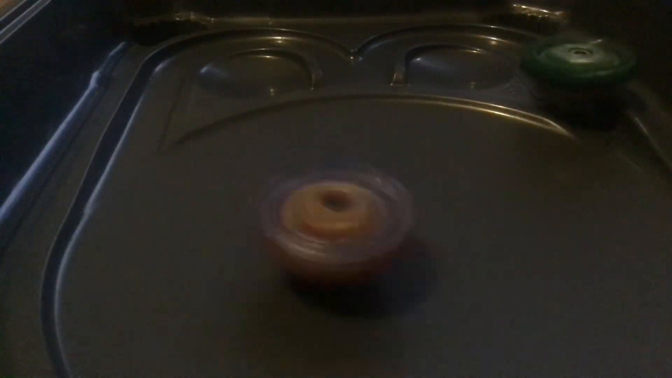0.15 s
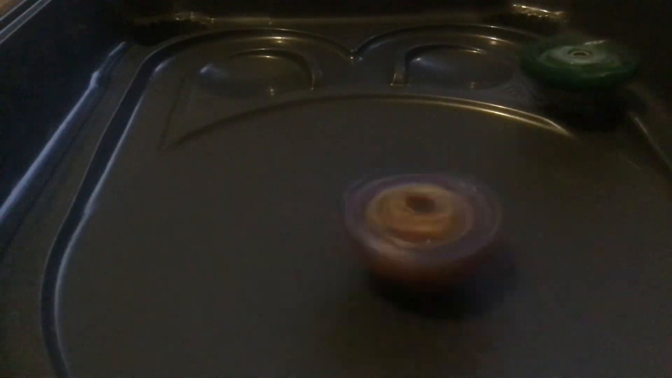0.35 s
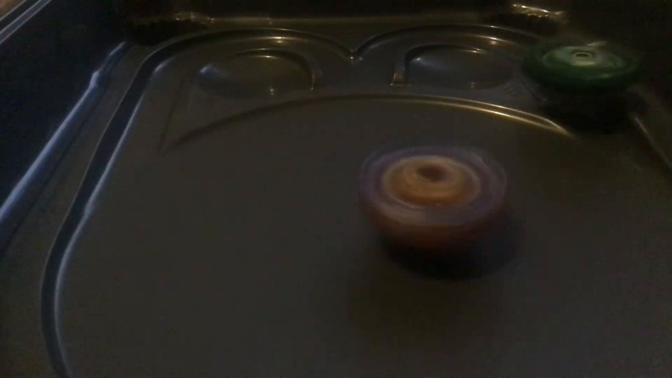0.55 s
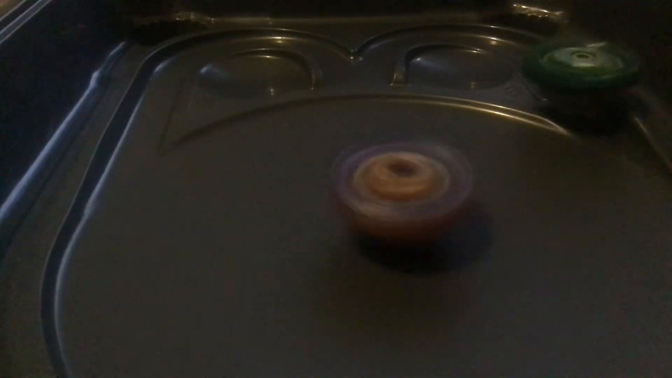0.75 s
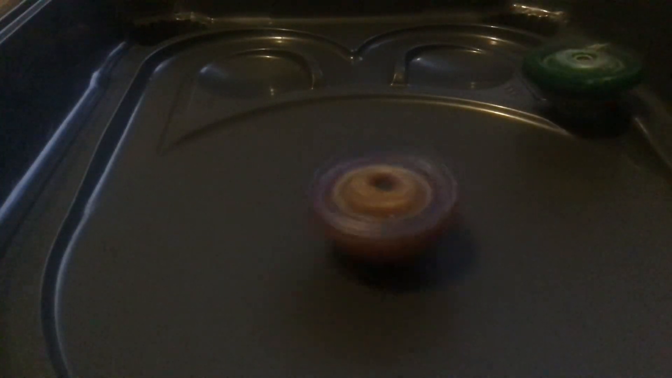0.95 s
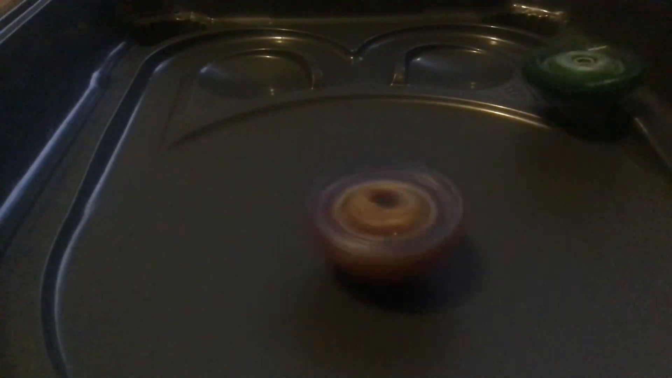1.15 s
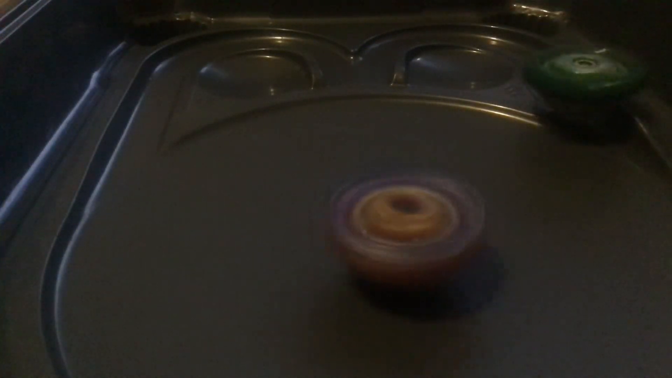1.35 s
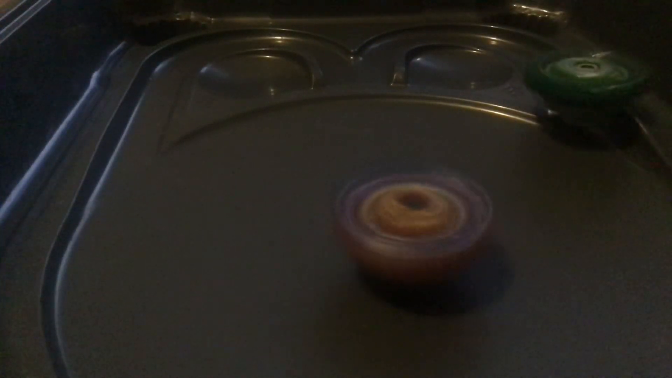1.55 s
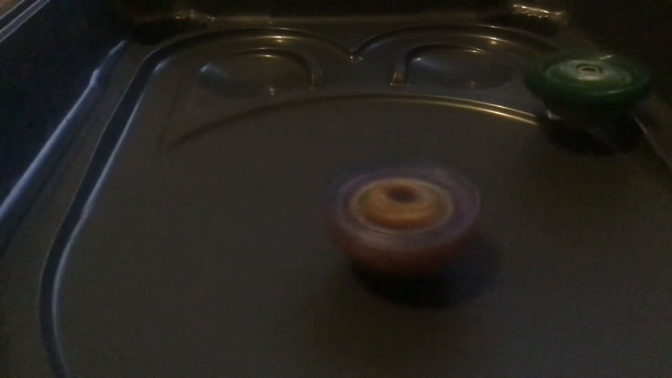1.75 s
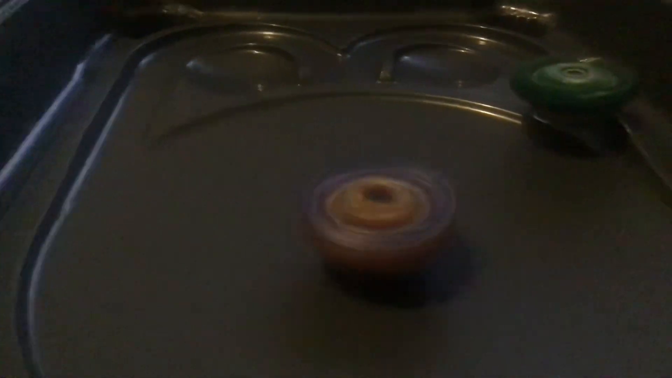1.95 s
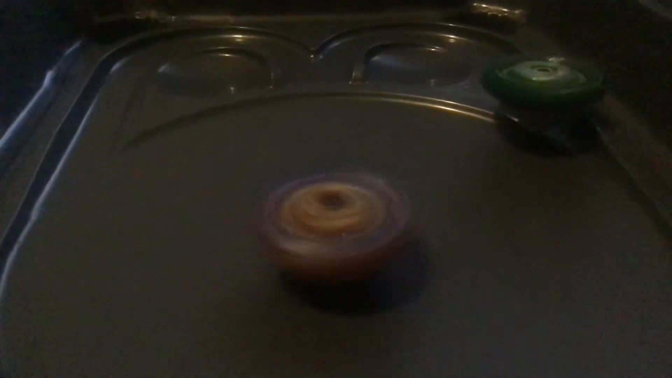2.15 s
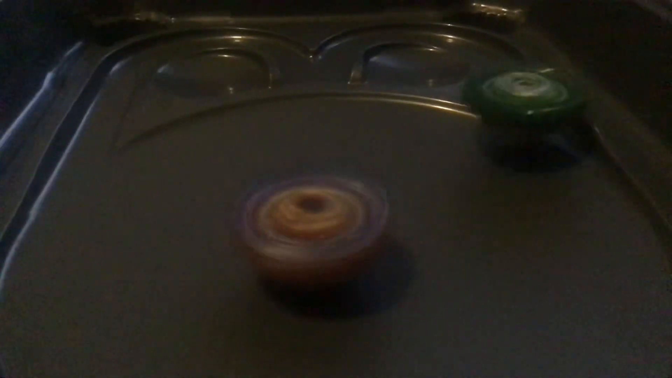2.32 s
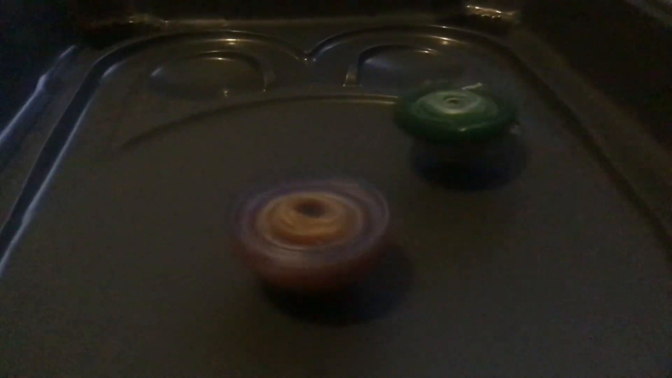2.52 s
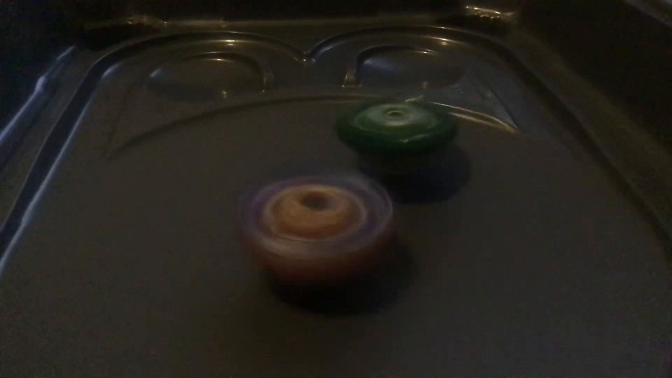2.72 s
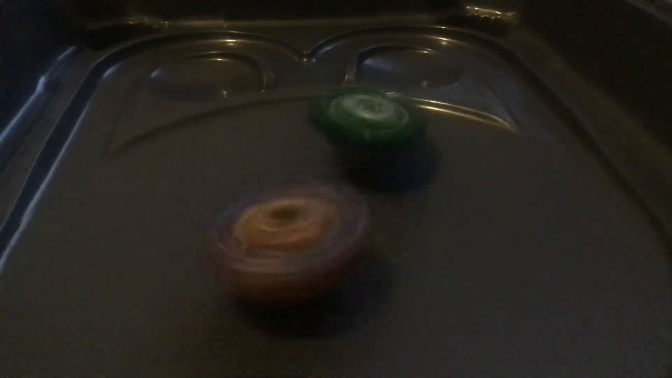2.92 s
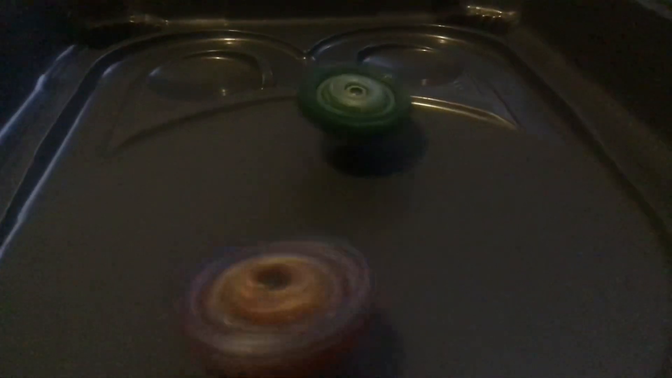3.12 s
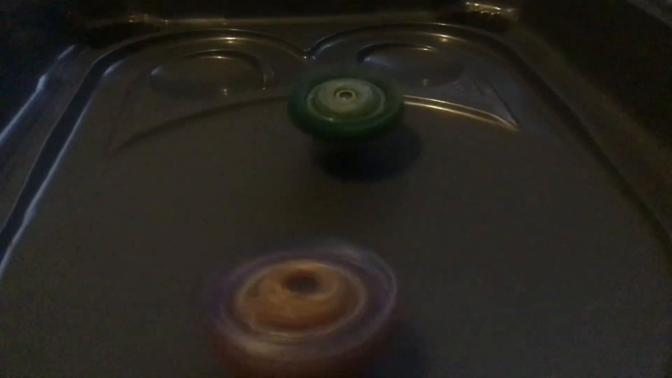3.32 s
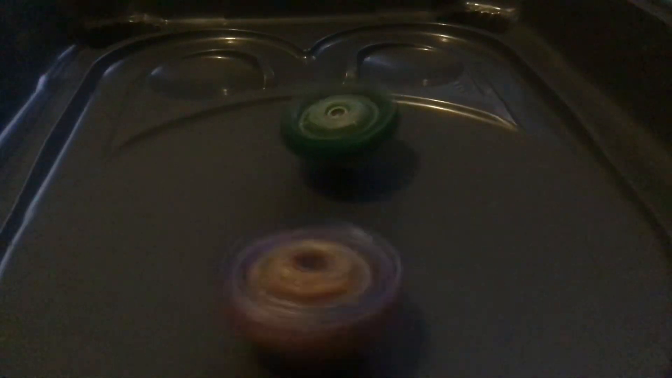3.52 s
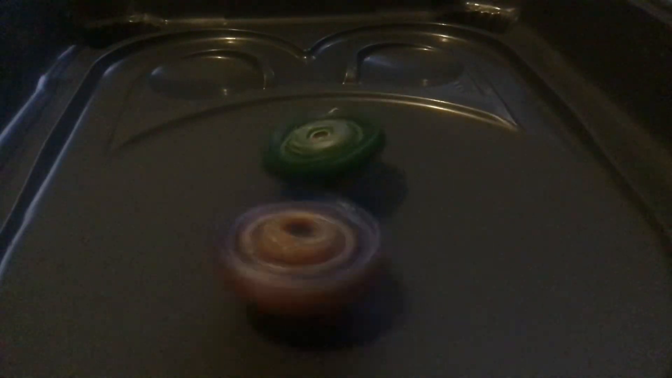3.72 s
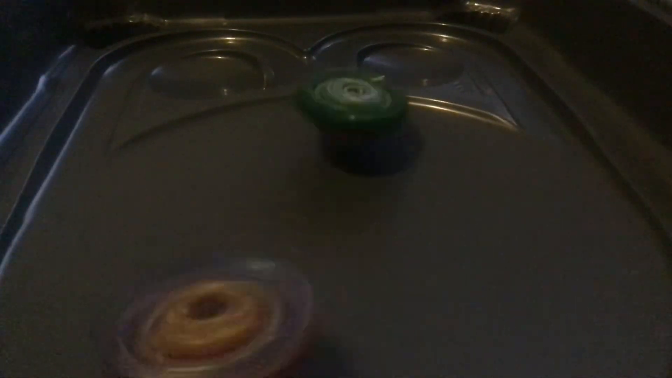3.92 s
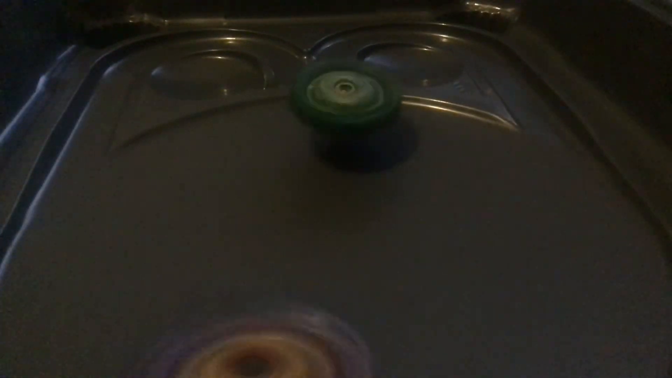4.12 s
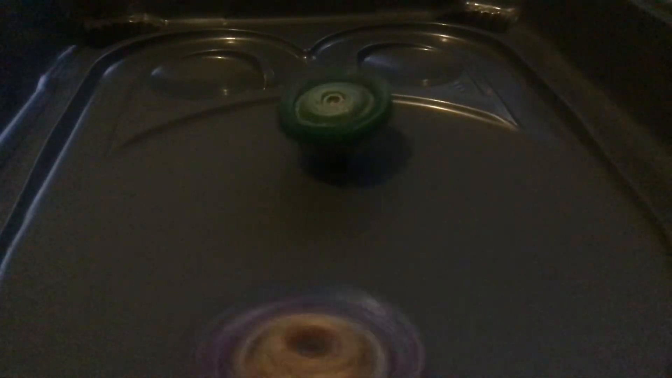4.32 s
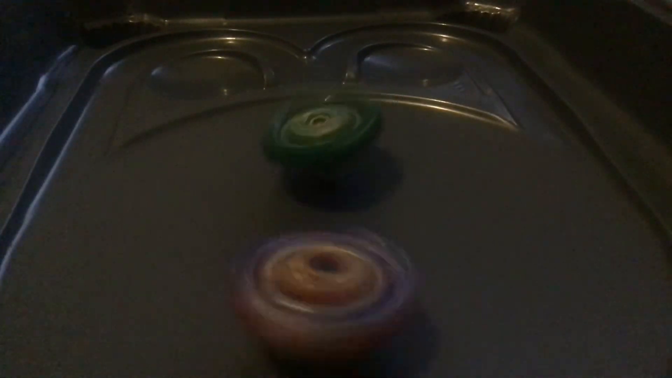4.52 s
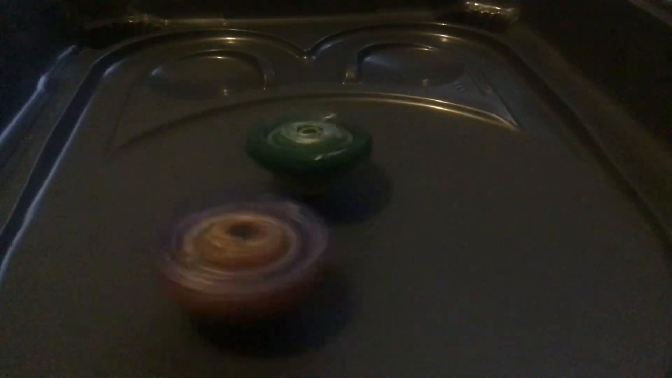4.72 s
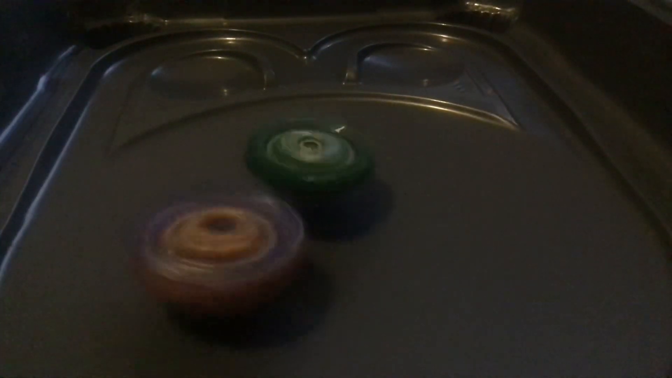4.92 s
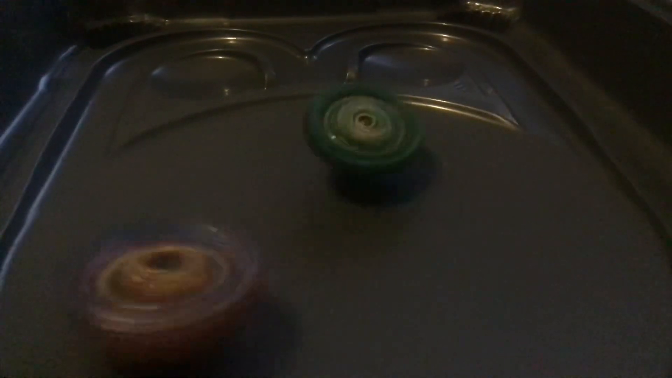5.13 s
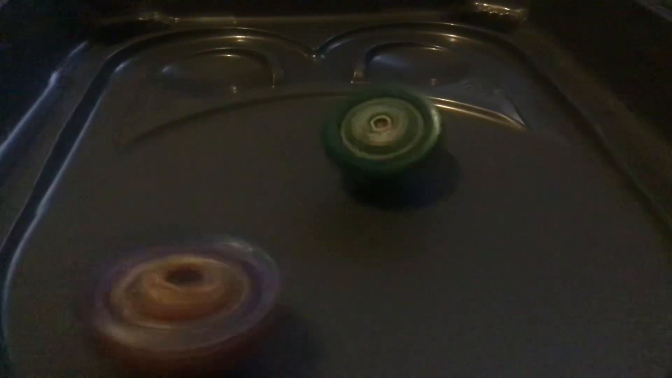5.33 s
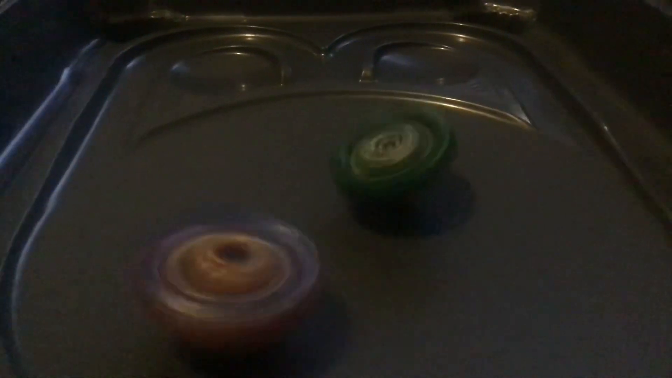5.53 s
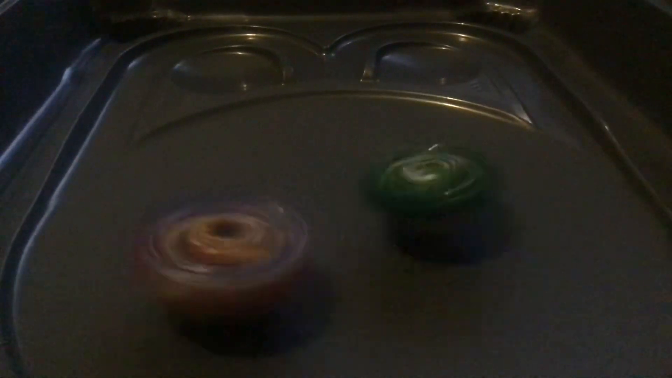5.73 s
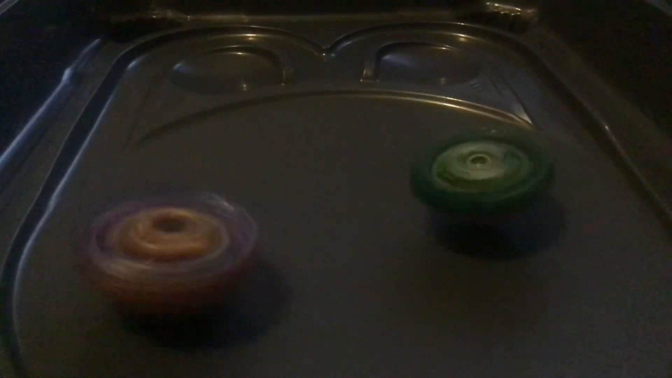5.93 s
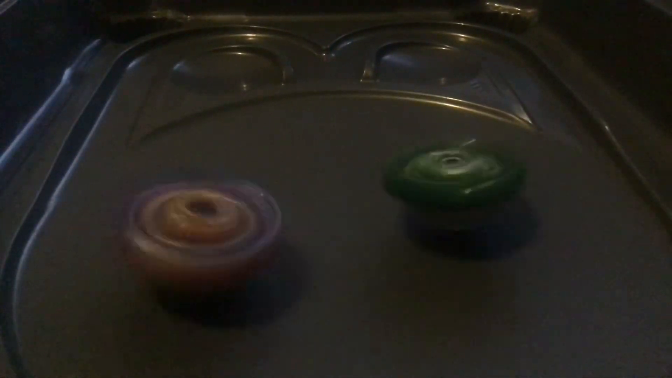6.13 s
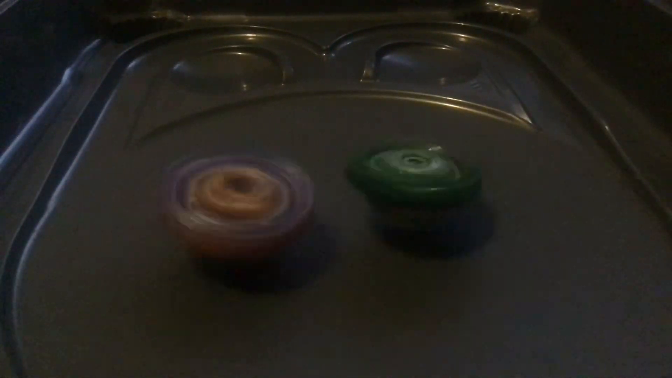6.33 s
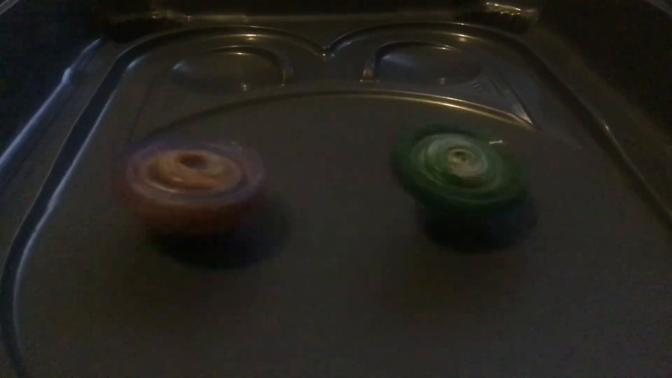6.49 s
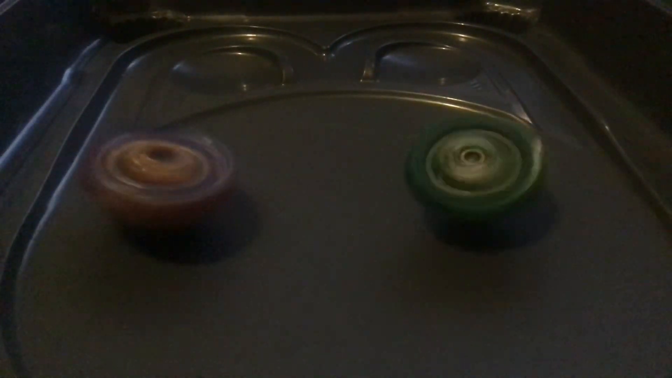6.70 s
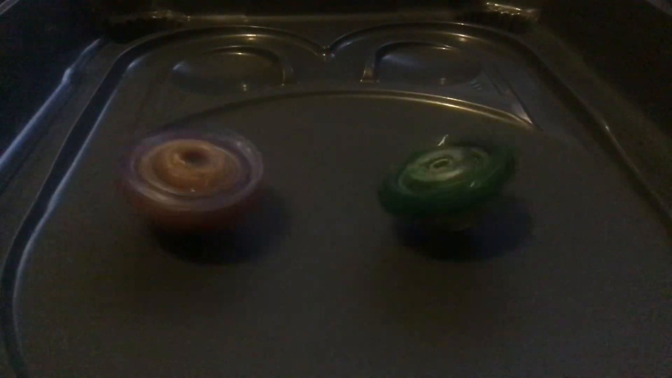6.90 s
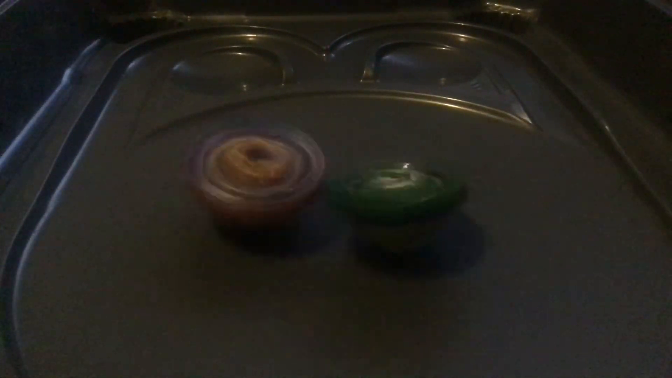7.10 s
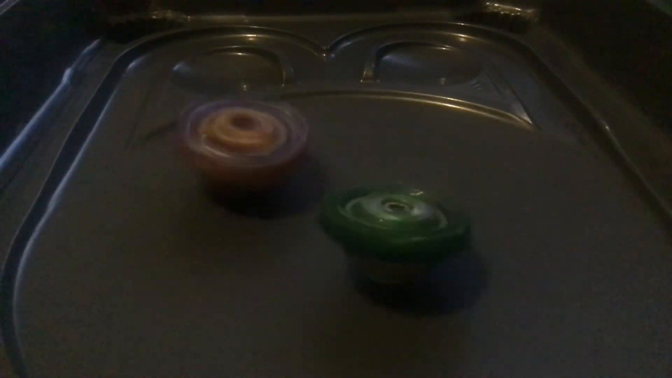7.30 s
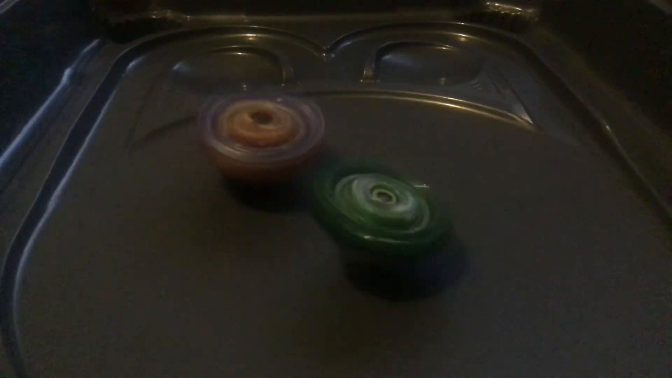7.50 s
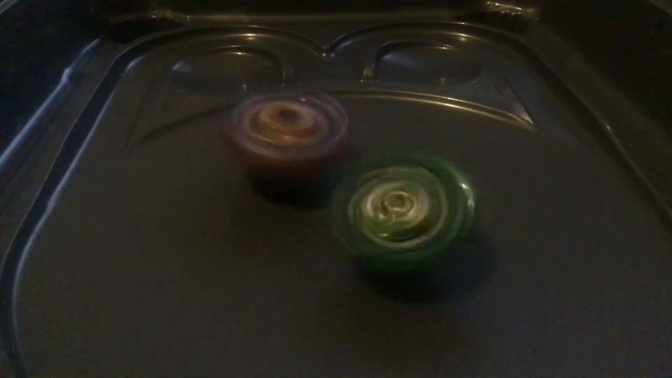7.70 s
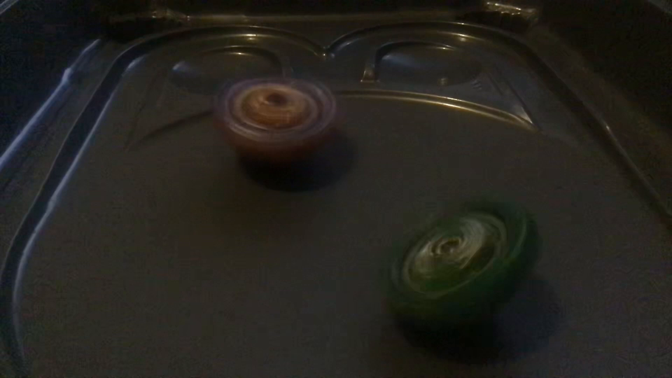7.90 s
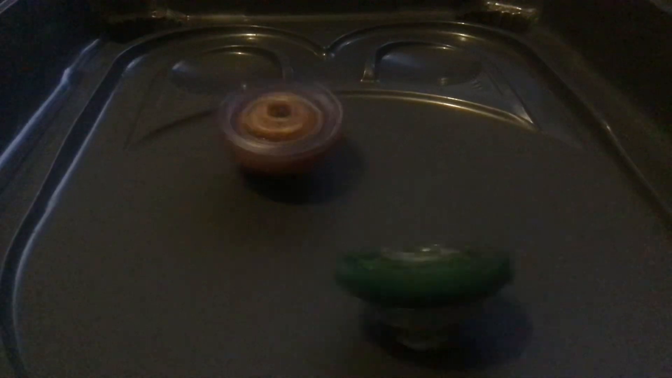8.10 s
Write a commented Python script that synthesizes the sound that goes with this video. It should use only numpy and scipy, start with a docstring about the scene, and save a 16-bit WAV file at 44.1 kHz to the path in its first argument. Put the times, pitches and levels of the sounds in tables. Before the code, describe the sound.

Close to a thin plastic arena in a small quiet room, a fast toy top hums and hisses while rapid knocks rattle the wall, thinning into soft boomy taps. From about three seconds two tops strike each other eight times, each a loud hard clack with a brief metallic ring and drum-like floor thud. Between hits come scrapes, ticks and scuffs as the spin slows.

```python
"""A toy top hums and knocks quickly on the wall of a thin plastic arena, its tip hissing over the floor.
Each knock is a burst of micro-impacts through the wall's resonances; the hum follows the slowing spin.
Eight times two tops collide: a hard clack with a ring of metal discs, thuds on the drum-like floor and a
swell of rumble. In between, rims scrape and a wobbling top ticks and scuffs with its loose parts.
A small room answers with short reflections, over quiet air and a few faint falling tones."""
import sys
import numpy as np
from scipy import signal
from scipy.fft import rfft, irfft
from scipy.io import wavfile
from scipy.ndimage import uniform_filter1d

SR = 44100
rng = np.random.default_rng(int(sys.argv[2]) if len(sys.argv) > 2 else 0)


def inscribe(sig):
    """Save sig as 16-bit PCM at rate SR to the path in sys.argv[1].

    A 1-D sig is mono; a 2-D sig holds one channel per row.
    Samples are clipped to [-1, 1] before scaling.
    """
    pcm = np.round(np.clip(np.atleast_2d(sig).T, -1, 1) * 32767)
    wavfile.write(sys.argv[1], SR, pcm.astype(np.int16))


N = 359415
TIME = np.arange(N) / SR
HIT = 8192  # length of a blow [samples]
CREST_DB = 9.5  # assumed height of a burst's peak over its loudest short-term rms

# All table levels are settings ahead of the trims made where they are played.


def undb(db):
    """Decibels to gain."""
    return 10 ** (np.asarray(db) / 20)


def unit(x):
    """Scale to a standard deviation of 1."""
    return x / np.std(x)


def curves(table):
    """The columns of a table, interpolated sample by sample."""
    s, *columns = np.transpose(table)
    return [np.interp(TIME, s, column) for column in columns]


def add(track, s, sound):
    """Mix a sound into the track at time s."""
    i = int(np.clip(s * SR, 0, len(track) - 1))
    track[i:i + len(sound)] += sound[:len(track) - i]


def colour(x, points):
    """Minimum-phase filter with the given spectrum, so no sound comes ahead of its cause."""
    hz, db = np.transpose(points)
    grid = np.fft.rfftfreq(HIT, 1 / SR) + 1
    # beyond the end points the spectrum falls 20 dB per octave
    octaves_below = np.maximum(np.log2(hz[0] / grid), 0)
    octaves_above = np.maximum(np.log2(grid / hz[-1]), 0)
    level_db = np.interp(np.log(grid), np.log(hz), db) - 20 * (octaves_below + octaves_above)
    # folding the cepstrum onto positive time makes the filter causal
    cepstrum = irfft(np.log(undb(level_db)))
    cepstrum[1:HIT // 2] *= 2
    cepstrum[HIT // 2 + 1:] = 0
    response = irfft(np.exp(rfft(cepstrum)))
    return signal.fftconvolve(x, response)[:len(x)]


def ring(x, modes):
    """Drive a set of damped resonances; neighbours move in opposite directions."""
    out = 0
    for k, (hz, width_hz, db) in enumerate(modes):
        b, a = signal.iirpeak(hz, hz / width_hz, fs=SR)
        out = out + (-1) ** k * undb(db) * signal.lfilter(b, a, x)
    return out


def contact(rise_s, decay_s):
    """Force of a spinning rim catching on something: a dense run of micro-impacts that dies away."""
    t = TIME[:HIT]
    return rng.standard_normal(HIT) * (1 - np.exp(-t / rise_s)) * np.exp(-t / decay_s)


def peak(x, db):
    """Set a burst's nominal peak level from its loudest two milliseconds."""
    loudest_power = uniform_filter1d(x ** 2, size=88).max()
    return x * undb(db - CREST_DB) / np.sqrt(loudest_power)


def walk(rate):
    """Smooth random wandering with a spread of 1; a new target comes at the given rate [Hz]."""
    k = int(SR / rate)
    steps = np.repeat(rng.standard_normal(N // k + 1), k)
    return unit(uniform_filter1d(uniform_filter1d(steps, k), k)[:N])


# collisions: (time [s], clack level [dB], body knock level re clack [dB], body note [Hz],
#   disc ring level re clack [dB], disc pitch [Hz], top snap level re clack [dB], contact decay [s],
#   floor thud level [dB], panel slap level re thud [dB], lean level [dB])
COLLISIONS = [(2.9852, -2.5, -18.5, 480, -5.5, 4170, -16, 0.0022, -25, 4, -29.5),
              (3.9051, 0, -23, 437, -12.5, 3880, -21.5, 0.0024, -23, -6.5, -30.5),
              (4.8006, -2.5, -26.5, 1280, -6, 4140, -21.5, 0.0018, -26.5, -9.5, -46),
              (5.1341, -2.5, -24.5, 700, -2.5, 3850, -21, 0.002, -24.5, -21, -40),
              (5.8323, -5.5, -18.5, 1420, -8, 5350, -20.5, 0.0022, -24.5, -5.5, -45),
              (6.548, -3, -27.5, 518.8, -2, 5820, -21, 0.0022, -19, -6.5, -53),
              (7.2432, -1.5, -25.5, 1330, -16, 4400, -22, 0.0017, -18, -6, -53),
              (7.8118, -4.5, -24.5, 396, -19, 4800, -23.5, 0.0019, -31.5, -16, -48.5)]
# a weaker burst of the crack noise leading into two of the clacks: (time [s], level [dB])
CRACK_ONSETS = [(3.9013, -14.5), (7.8093, -19)]
# spectra of the hard crack, its top snap and the plastic bodies: (frequency [Hz], level [dB])
CRACK = [(1410, -32.5), (2400, -8), (2910, -14), (3320, -8.5), (3800, -4.5), (4660, -2), (5060, -6),
         (6820, -4.5), (7550, -6), (9810, -8.5), (11000, -11.5), (14300, -25), (22000, -120)]
SNAP = [(7500, -28.5), (10000, -4.5), (12000, 0.5), (15000, 3), (16000, -3.5)]
BODY = [(120, -6), (250, 6), (450, 2.5), (700, 3.5), (950, -2), (1350, 3), (1900, -5), (2700, -25.5),
        (4000, -30)]
# short notes of the hard rims: (frequency [Hz], width [Hz], level [dB])
RIM_MODES = [(1290, 87, -7), (1972, 91, -8), (2730, 46, -14), (3900, 95, 2.5), (4160, 83, -0.5),
             (5810, 210, 0.5), (6680, 160, -2.5), (8170, 56, -8), (9100, 170, -1), (10550, 490, -4.5)]


def collisions():
    """Rim hits rim: a hard crack, a short ring of the metal discs, a knock and a clatter of the bodies."""
    out = np.zeros(N)
    for s, db, body_db, body_hz, disc_db, disc_hz, snap_db, decay_s, *_ in COLLISIONS:
        force = echoed(contact(rise_s=0.0033, decay_s=decay_s), wet_db=-9.0)
        add(out, s, peak(colour(force, CRACK), db - 1.5))
        add(out, s, peak(ring(contact(rise_s=.0008, decay_s=.001), RIM_MODES), db - 4))
        add(out, s, peak(colour(force, SNAP), db + snap_db + 8.5))
        add(out, s, peak(ring(force, [(disc_hz, 260, 0)]), db + disc_db - 7.0))
        # the bodies' knock and its note follow a moment later
        push = echoed(contact(rise_s=0.00029, decay_s=0.0034), wet_db=-6.0)
        add(out, s + 0.00066, peak(colour(push, BODY), db + body_db + 9.5))
        note = ring(signal.unit_impulse(HIT), [(body_hz, 170, 0)])
        add(out, s + .001, peak(note, db + body_db + 5))
        # the jolted parts clatter on, ever more weakly
        for lag_s in rng.uniform(.012, .13, size=7):
            bounce = colour(contact(rise_s=.0003, decay_s=0.0017), BODY)
            add(out, s + lag_s, peak(bounce, db - 23.5) * np.exp(-lag_s / 0.075))
    for s, db in CRACK_ONSETS:
        add(out, s, peak(colour(contact(rise_s=0.0002, decay_s=0.0027), CRACK), db))
    return out


# a top dropping back onto the floor: (time [s], level [dB])
LANDINGS = [(3.063, -24), (3.335, -26), (3.361, -22), (3.951, -23), (4.825, -23.5), (5.163, -26.5),
            (5.2, -27.5), (5.874, -21.5), (5.905, -27), (6.611, -26), (7.282, -25.5)]
# resonances of the drum-like floor and of the slapped panel: (frequency [Hz], width [Hz], level [dB])
FLOOR_MODES = [(60.3, 9.3, -6), (83, 8.2, 0), (110.5, 15, -2), (163, 44, -5)]
SLAP_MODES = [(198.6, 49, 0), (270, 24, 2), (330, 50, -4.7)]
LANDING_SLAP_DB = -17  # slap of a landing, set against its thud


def thuds():
    """A soft push at each collision and landing rings the floor like a slack drum; the panel adds a slap."""
    out = np.zeros(N)
    t = TIME[:HIT] / 0.00046
    push = t * np.exp(-t)
    blows = [(s, db, slap_db) for s, *_, db, slap_db, _ in COLLISIONS]
    blows += [(s, db, LANDING_SLAP_DB) for s, db in LANDINGS]
    places = rng.standard_normal((len(blows), len(FLOOR_MODES)))
    for (s, db, slap_db), place in zip(blows, places):
        # each place on the floor favours other modes
        modes = [(hz, width_hz, mode_db + 2 * shift)
                 for (hz, width_hz, mode_db), shift in zip(FLOOR_MODES, place)]
        add(out, s, peak(ring(push, modes), db + 6.0))
        add(out, s, peak(ring(push, SLAP_MODES), db + slap_db + 7.5))
    return out


# a top knocking on the wall: (time [s], level [dB], panel boom re knock [dB], bright edge re knock [dB])
KNOCKS = [(0.034, -24, -6.5, -14.5), (0.115, -23.5, -11, -14), (0.1965, -23.5, -11, -16),
          (0.2795, -24.5, -15.5, -12.5), (0.3436, -21, -13, -19), (0.3615, -25.5, -11, -14),
          (.4531, -20, -15.5, -20), (0.4717, -25, -8, -13), (0.5833, -23, -9.5, -16.5),
          (0.6981, -20.5, -13.5, -16.5), (.8118, -23.5, -15.5, -14), (0.8179, -21.5, -10, -20),
          (0.9045, -20, -14, -19), (0.9344, -23.5, -9.5, -20), (0.9649, -24, -12, -20),
          (0.9848, -27.5, -7, -10.5), (0.9902, -24, -11, -18), (1.0786, -24.5, -10, -13),
          (1.1373, -25.5, -9, -14), (1.1986, -27.5, -8.5, -18), (1.2297, -29.5, -8, -17),
          (1.256, -28, -9.5, -11), (1.3112, -31.5, -11, -11), (1.341, -36.5, -5, -7), (1.3668, -32, -6, -9),
          (1.46, -26.5, -6.5, -12.5), (1.5474, -26, -3.5, -13), (1.608, -32.5, -9, -12),
          (1.6392, -29, -1.5, -14), (1.733, -27.5, -1.5, -16), (1.824, -28.5, 0, -17),
          (1.886, -27.5, -0.5, -23), (2.0108, -45, 9, -25), (2.1687, -36.5, 4, -27),
          (2.2052, -32.5, -8, -23), (2.2715, -34.5, -2, -24), (3.073, -38.5, -3, -17),
          (3.095, -32.5, -13, -13), (3.2955, -38, -8, -7), (4.035, -36.5, -20, -12), (4.575, -51.5, 8, -21),
          (5.8653, -26, -14, -20), (5.8888, -29, -21, -25)]
# spectra of the wall and of the rim's bright edge: (frequency [Hz], level [dB])
WALL = [(700, -9), (900, -11), (1100, 3), (1300, -4.5), (1600, -1.5), (1880, 3.5), (2200, 0.5),
        (2600, -11.5), (2950, -3.5), (3250, -10), (3650, -4.5), (4900, -14.5), (6000, -47)]
EDGE = [(3500, -11), (5500, 1), (7000, -3), (8300, -16), (9400, -7.5), (10500, -47), (11800, -12),
        (15000, -23)]
# boom of the wall panel: (frequency [Hz], width [Hz], level [dB])
PANEL_MODES = [(182, 154, -12), (296, 18.5, -4.5), (354, 63, -3.5), (396, 62, 1), (550, 19, -8),
               (617, 12, -10), (697, 22, -6.5), (796, 23, -18)]
TOUCH_LEAD_S, TOUCH_DB = 0.0053, -17  # a light touch comes ahead of each knock


def knocks():
    """The rim touches the wall, then catches it in two lobes; slow bending waves bring low notes later."""
    out = np.zeros(N)
    for s, db, boom_db, edge_db in KNOCKS:
        touch = contact(rise_s=.001, decay_s=0.0028)
        touch = colour(touch, WALL) + undb(-8) * colour(touch, EDGE)
        add(out, s - TOUCH_LEAD_S, peak(touch, db + TOUCH_DB))
        force = contact(rise_s=0.000766, decay_s=0.0025)
        second_lobe = undb(-9) * contact(rise_s=0.00046, decay_s=0.005)
        add(force, rng.uniform(.003, .005), second_lobe)
        force = echoed(force, wet_db=-16.5)
        add(out, s, peak(colour(force, EDGE), db + edge_db + 4))
        add(out, s + 0.00094, peak(colour(force, WALL), db + .5))
        boom = ring(contact(rise_s=0.00108, decay_s=0.00202), PANEL_MODES)
        add(out, s + .002, peak(boom, db + boom_db + 8.5))
    return out


# a leaning rim dragging along the plastic: (start [s], end [s], level [dB], least pressure re full [dB])
SCRAPES = [(2.005, 2.226, -46.5, -3.5), (3.232, 3.361, -30, -22), (4.592, 4.788, -53, -9),
           (7.91, 8.151, -54.5, -1)]
# broad rubbing noise: (frequency [Hz], level [dB])
RUB = [(120, 10), (240, -6), (400, -9), (550, -1.5), (760, 3), (950, -16), (1300, -1), (1900, -11),
       (3500, -11), (6000, -18.5), (12000, -40)]
# resonances of the rubbed wall: (frequency [Hz], width [Hz], level [dB])
RUB_MODES = [(148, 33, 1.5), (229, 87, 2.5), (384, 40, 2.5), (638, 39, -2), (807, 38.5, -5.5),
             (1279, 61, -7.5), (1370, 40, -9), (2234, 69, -19)]


def scrapes():
    """Stick and slip shakes the wall's resonances, pressing harder until the rim springs free."""
    out = np.zeros(N)
    for start_s, end_s, db, start_db in SCRAPES:
        progress = np.linspace(0, 1, int((end_s - start_s) * SR))
        press = np.maximum(undb(start_db), np.sin(np.pi / 2 * progress) ** 4)
        # slips of random strength, about 3500 a second
        slipping = rng.random(len(press)) < 3500 / SR
        slips = np.zeros(len(press) + HIT)
        add(slips, 0, press * rng.standard_normal(len(press)) * slipping)
        rub = ring(slips, RUB_MODES) + undb(-13.5) * colour(slips, RUB)
        add(out, start_s, peak(rub, db + 16.0))
    return out


# bouts of wobbling: (first tick [s], end [s], sway period [s], tick level [dB], scuff level [dB],
#   shell ring level [dB])
WOBBLES = [(4.2368, 4.44, 0.083, -52, -61, -55.5), (5.3119, 5.8, 0.047, -43, -45, -46.5),
           (6.078, 6.53, 0.054, -50.5, -49, -54), (6.7453, 7.2, .0603, -45.5, -49.5, -46),
           (7.489, 7.8, .0699, -51.5, -58, -47.5), (7.9945, 8.1, 0.08, -50.5, -58, -38.5)]
# single hard scuffs as the tired top lurches: (time [s], level [dB], shell ring level [dB])
SCUFFS = [(4.7665, -41, -34.5), (5.4058, -40, -42), (5.4317, -36.5, -50.5), (5.6174, -44, -41),
          (5.663, -41.5, -41), (6.0007, -52, -41.5), (6.319, -48, -48), (6.376, -41, -44),
          (6.6629, -43, -36), (6.8454, -51, -38.5), (6.911, -50, -35), (6.964, -40, -58),
          (7.0239, -42, -55), (7.1505, -52, -33.5), (7.2002, -46, -34.5), (7.7327, -37, -49),
          (7.9637, -43.5, -34), (8.0448, -36, -30), (8.1188, -35.5, -39), (8.1444, -51, -30)]
SCUFF_PHASE = 0.4  # the tip scuffs this share of a sway after each tick
SCUFF_SHELL_DB = -8  # shell ring of a sway's scuff, set against the scuff
SWAY_SCATTER_DB = 1  # spread of the levels from sway to sway


def wobble():
    """Each sway brings a tick, then a scuff; lurches add hard scuffs of their own."""
    out = np.zeros(N)
    for start_s, end_s, period_s, tick_db, scuff_db, shell_db in WOBBLES:
        for s in np.arange(start_s, end_s, period_s):
            stray_db = SWAY_SCATTER_DB * rng.standard_normal(3)
            add(out, s, tick(tick_db + stray_db[0], shell_db + stray_db[1]))
            rub = undb(stray_db[2]) * scuff(scuff_db, scuff_db + SCUFF_SHELL_DB)
            add(out, s + SCUFF_PHASE * period_s, rub)
    for s, db, shell_db in SCUFFS:
        add(out, s, scuff(db, shell_db))
    return out


# resonances of the loose parts and of the top's shell: (frequency [Hz], width [Hz], level [dB])
TICK_MODES = [(3460, 1100, 3), (5450, 120, 3.5), (7000, 850, -5.5), (9000, 520, -2.5), (10950, 430, 2),
              (12900, 900, -10)]
SHELL_MODES = [(1325, 137, 22), (1600, 160, 9.5), (2240, 160, 1.5)]
# dry rubbing, in the scuffs and in the middle of a tick: (frequency [Hz], level [dB])
SCUFF = [(900, -14.5), (2300, -2), (3300, 0.5), (4300, -23.5), (5400, -6.5), (7000, -39), (12000, -40.5)]


def tick(db, shell_db):
    """Loose parts drop into their seats, ring the shell and jiggle on."""
    force = contact(rise_s=0.00081, decay_s=0.0022)
    out = peak(ring(force, TICK_MODES), db + .5) + peak(colour(force, SCUFF), db - 5)
    add(out, 0.00085, peak(ring(force, SHELL_MODES), shell_db + 7))
    for lag_s in rng.uniform(.006, 0.068, size=4):
        jiggle = contact(rise_s=0.00025, decay_s=0.0014)
        rattle = ring(jiggle, SHELL_MODES) + undb(-12.5) * colour(jiggle, SCUFF)
        add(out, lag_s, peak(rattle, shell_db - 6.5))
    return out


def scuff(db, shell_db):
    """The edge of the tip rubs the floor for a moment and rings the shell."""
    force = contact(rise_s=0.0036, decay_s=0.0019)
    return peak(colour(force, SCUFF), db + 1) + peak(ring(force, SHELL_MODES), shell_db)


# the spin running down: (time [s], turns per second [Hz])
SPIN = [(0, 57.24), (.56, 55.48), (.8, 52.63), (1.55, 48.64), (2.9, 42.36), (4.1, 41), (5, 38.02),
        (5.7, 33.85), (7, 29.84), (8.15, 26.13)]
# how hard the imbalance shakes the floor: (time [s], level [dB])
SHAKE = [(0, -48.5), (.39, -31.5), (.56, -32), (.77, -51.5), (1.3, -47), (1.9, -49), (3.7, -53), (6.2, -49),
         (8.15, -53)]
# how well the floor radiates that shaking: (frequency [Hz], level [dB])
FLOOR_RESPONSE = [(28, -30), (42, -13), (52, -0.5), (80, -2), (112, -0.5), (130, -4.5), (170, -9.5)]
# tips travelling over the floor: (time [s], rumble level [dB], panel drone level [dB],
#   grinding level [dB], hiss level [dB])
ROLL = [(0, -47.5, -74, -63, -60.5), (.36, -43, -69, -59.5, -61.5), (1.1, -54, -58, -64.5, -60.5),
        (1.75, -48.5, -54.5, -58, -60.5), (2.24, -45, -49.5, -59.5, -60), (2.65, -51, -60, -67.5, -66),
        (3, -52.5, -62, -62.5, -62.5), (3.3, -50, -58, -53, -60), (3.5, -59.5, -73.5, -72, -65),
        (4.1, -49.5, -57.5, -56.5, -61.5), (4.45, -60.5, -69.5, -66.5, -67), (4.72, -41, -59.5, -58, -61),
        (5, -58, -68.5, -68.5, -59.5), (5.4, -54.5, -55.5, -60, -59.5), (5.8, -50.5, -63, -63, -59.5),
        (6.2, -56, -72, -69, -68), (6.95, -54, -60.5, -62.5, -64.5), (7.6, -56.5, -65.5, -72.5, -67.5),
        (8.15, -48, -57, -56.5, -64.5)]
# spectra of these layers: (frequency [Hz], level [dB])
RUMBLE = [(35, -38.5), (60, -1.5), (85, -1), (130, 4), (180, -4), (260, -17), (400, -29.5), (800, -57.5)]
DRONE = [(170, -22), (270, 3.5), (340, -2), (410, -4.5), (520, -20), (900, -31)]
GRIND = [(300, -14), (500, 2), (700, 2), (950, -6.5), (1350, -4.5), (2000, -17), (3500, -23)]
HISS = [(900, -15.5), (1500, -5.5), (2200, -4), (3200, -3), (4000, -5.5), (5000, -5.5), (7000, -14.5),
        (15000, -31.5)]
# fine high hiss, steady at first, fainter after the first clack: (time [s], level [dB])
HIGH_HISS = [(0, -66), (2.9, -66.5), (3.5, -71), (4.9, -73.5), (5.5, -73.5), (6.2, -79.5), (8.15, -77)]
# its spectrum: (frequency [Hz], level [dB])
HIGH_HISS_SPECTRUM = [(2900, -14), (3700, -2.5), (4300, -3), (5000, 2), (5700, -7.5), (6300, -7),
                      (8000, -12.5), (9500, -13.5), (10500, -18), (15000, -25.5)]


def spinning():
    """Imbalance shakes the floor each turn; tips rumble, grind and hiss over it, under a fine high hiss."""
    hz, = curves(SPIN)
    shake_db, = curves(SHAKE)
    rumble_db, drone_db, grind_db, hiss_db = curves(ROLL)
    high_hiss_db, = curves(HIGH_HISS)
    leaning = lean()
    angle = 2 * np.pi * np.cumsum(hz) / SR
    floor_hz, floor_db = np.transpose(FLOOR_RESPONSE)
    hum = np.zeros(N)
    for k in range(1, 4):
        order_db = np.interp(k * hz, floor_hz, floor_db) + 2.1 * walk(7)
        hum += undb(order_db) * np.sin(k * angle + rng.uniform(0, 2 * np.pi))
    # the worn tip adds higher orders that swell and fade
    worn = sum(undb(3 * walk(5.6) - 3.0 * k) * np.sin(k * angle) for k in np.arange(4, 9))
    rumble = unit(colour(rng.standard_normal(N), RUMBLE)) * undb(2.0) + unit(worn) * undb(-8.0)
    # scratches are crossed in bunches, once a turn
    bumps = undb(1.6 * np.sin(angle) + 3.2 * walk(220))
    grit = np.zeros(N)
    for spectrum, db in [(DRONE, drone_db), (GRIND, grind_db + 1.5), (HISS, hiss_db - 1)]:
        grit += unit(colour(bumps * rng.standard_normal(N), spectrum)) * undb(db)
    high_hiss = unit(colour(rng.standard_normal(N), HIGH_HISS_SPECTRUM)) * undb(high_hiss_db - 4.0)
    hum *= undb(shake_db) + leaning
    rumble *= undb(rumble_db) + undb(-8) * leaning
    return hum + rumble + grit + high_hiss


LEAN_RISE_S, LEAN_SETTLE_S = .05, .16  # time constants


def lean():
    """Extra shaking after each collision: it builds quickly and settles as the tops right themselves."""
    out = np.zeros(N)
    t = TIME[:2 * SR]
    swell = (1 - np.exp(-t / LEAN_RISE_S)) * np.exp(-t / LEAN_SETTLE_S)
    for s, *_, db in COLLISIONS:
        add(out, s, undb(db) * swell)
    return out


# the room's decay: (frequency [Hz], time to fall 60 dB [s])
ROOM_T60 = [(300, 0.17), (1500, 0.28), (4000, 0.23), (8000, 0.26), (15000, 0.16)]


def reflections(onset_s):
    """Dense reflections of a small room, with unit energy; each band dies at its own rate."""
    t = TIME[:SR // 2]
    grid = np.log(np.fft.rfftfreq(len(t), 1 / SR) + 1)
    hz, t60_s = np.transpose(ROOM_T60)
    noise = rfft(rng.standard_normal(len(t)))
    tail = np.zeros(len(t))
    # overlapping bands, one around each frequency of the table
    for share, decay_s in zip(np.eye(len(hz)), t60_s):
        band = irfft(noise * np.interp(grid, np.log(hz), share), len(t))
        tail += band * np.exp(-np.log(1000) * t / decay_s)
    tail = tail * (1 - np.exp(-(t / onset_s) ** 2))
    return tail / np.linalg.norm(tail)


def echoed(force, wet_db):
    """A blow and its own fresh reflections, as spinning bodies radiate differently in every direction."""
    out = reflections(onset_s=0.0027) * undb(wet_db) * np.linalg.norm(force)
    add(out, 0, force)
    return out


# spectrum of the room air: (frequency [Hz], level [dB])
AIR = [(15, -45.5), (25, -24.5), (64, -6), (114, -0.5), (489, -29), (624, -22), (863, -27.5), (1290, -22),
       (1890, -31.5), (4610, -41), (11300, -47), (14400, -55.5), (16000, -87)]
AIR_DB = -60  # rms level
# faint, coo-like falling tones: (time [s], length [s], start pitch [Hz], end pitch [Hz], level [dB])
COOS = [(3.454, 0.15, 433, 382, -56.5), (6.115, 0.27, 440, 388.8, -54), (6.633, 0.17, 410, 400.7, -54)]


def background():
    """Quiet room air is shaped noise; the few faint falling tones are gliding sines."""
    out = unit(colour(rng.standard_normal(N), AIR)) * undb(AIR_DB)
    for s, length_s, start_hz, end_hz, db in COOS:
        hz = np.linspace(start_hz, end_hz, int(length_s * SR))
        tone = np.sin(2 * np.pi * np.cumsum(hz) / SR)
        add(out, s, undb(db) * np.hanning(len(hz)) * tone)
    return out


def scene():
    """The clacks and knocks carry their own echoes; scrapes and wobbles get a little room."""
    chatter = scrapes() + wobble()
    room = undb(-18) * signal.fftconvolve(chatter, reflections(onset_s=0.00385))[:N]
    return (collisions() + thuds() + knocks() + chatter + room + spinning() + background())[None]


def record(dry):
    """The microphone loses the deep bass, rounds the highest peaks and cuts the top."""
    x = signal.sosfilt(signal.butter(4, 35, "high", fs=SR, output="sos"), dry)
    x = np.tanh(1.1 * x) / 1.1
    top_cut = signal.ellip(8, .2, 70, 15700, fs=SR, output="sos")
    return signal.sosfilt(top_cut, x)


dry = scene()
out = record(dry)
inscribe(out)
```